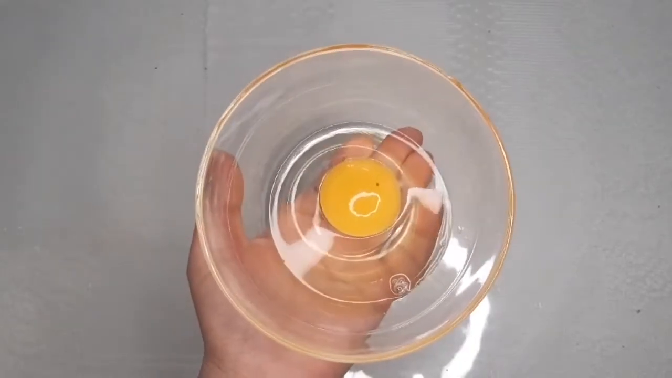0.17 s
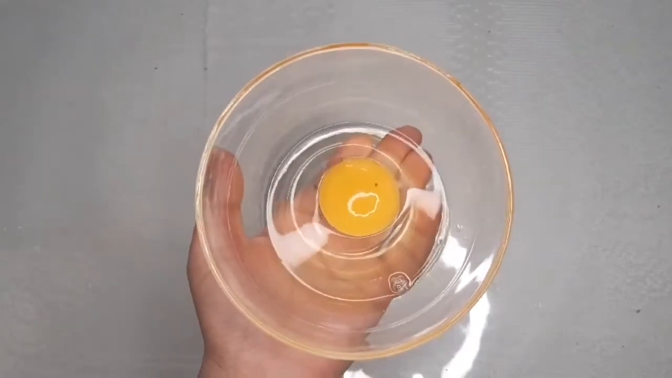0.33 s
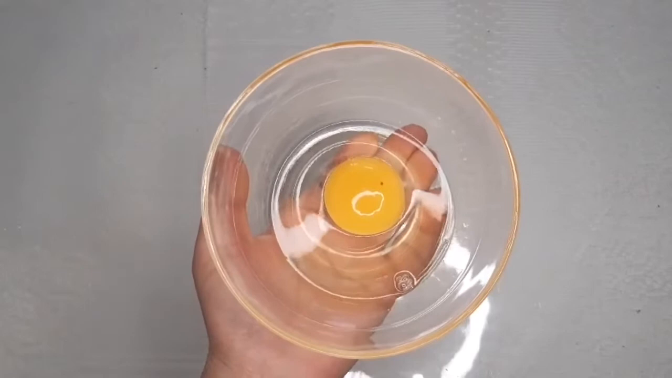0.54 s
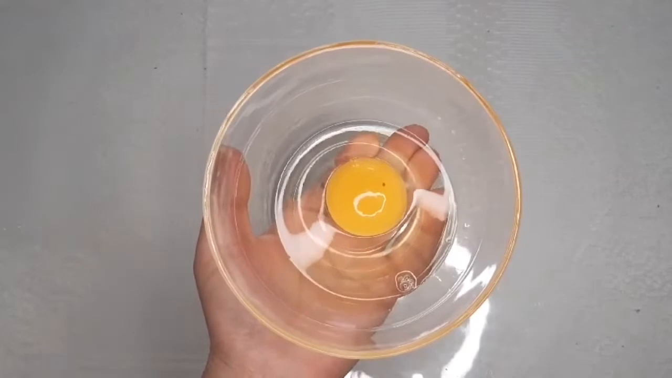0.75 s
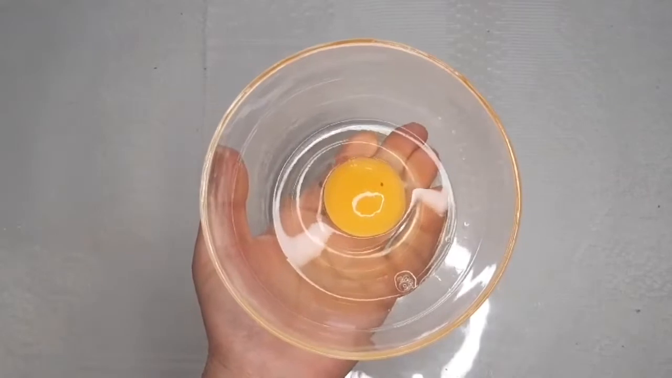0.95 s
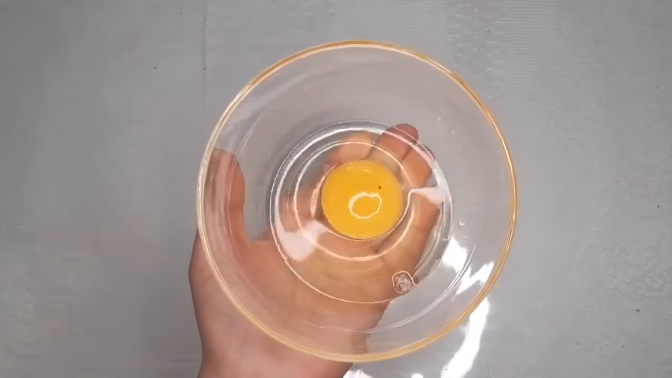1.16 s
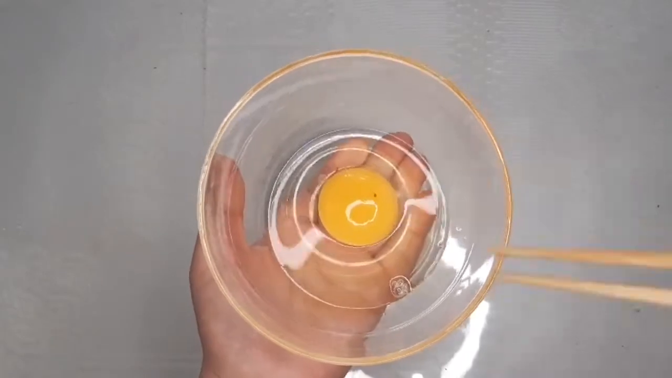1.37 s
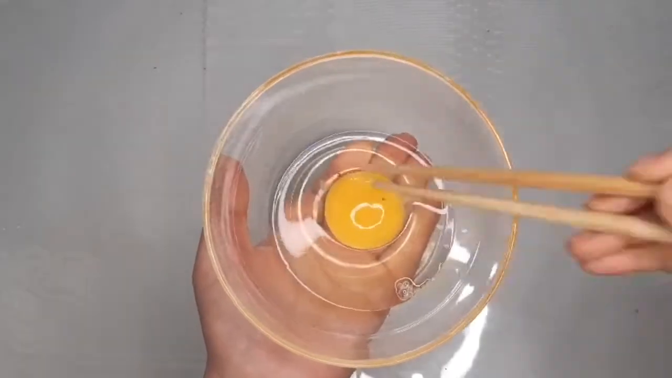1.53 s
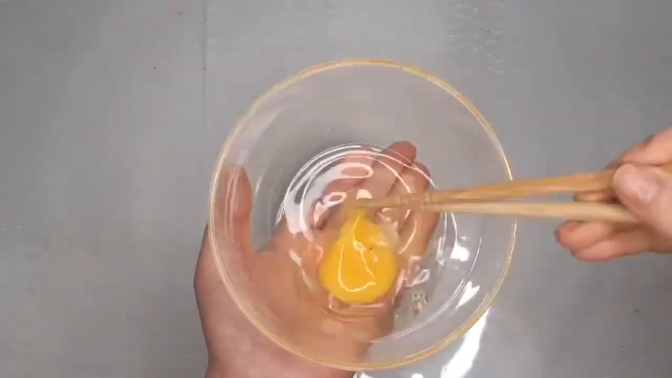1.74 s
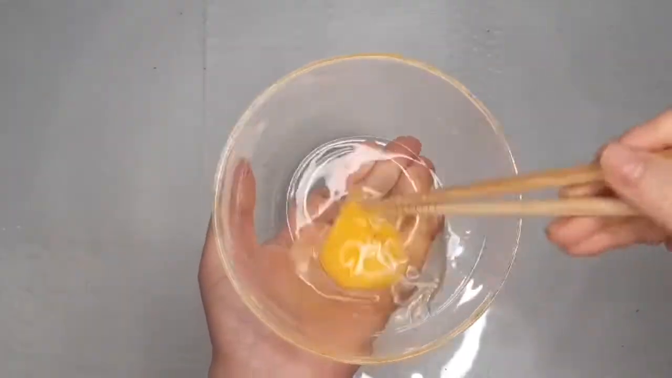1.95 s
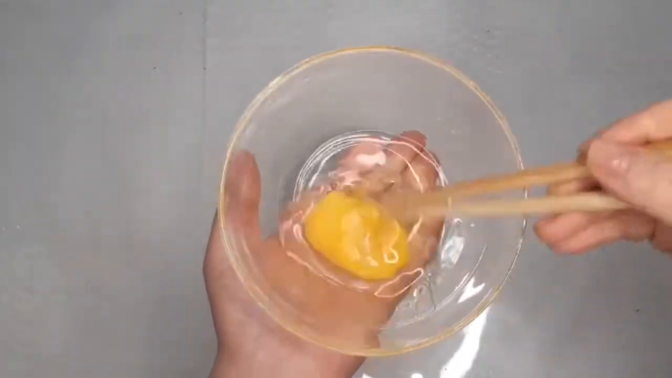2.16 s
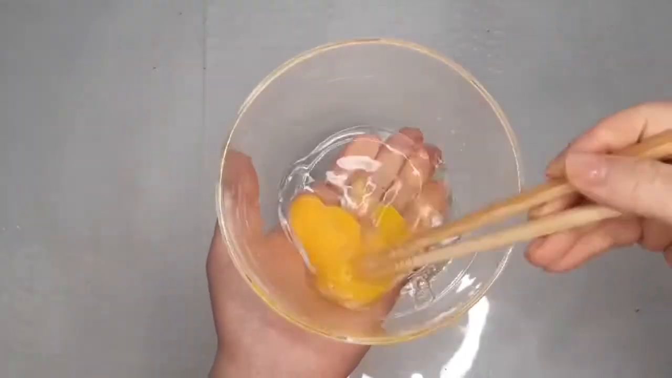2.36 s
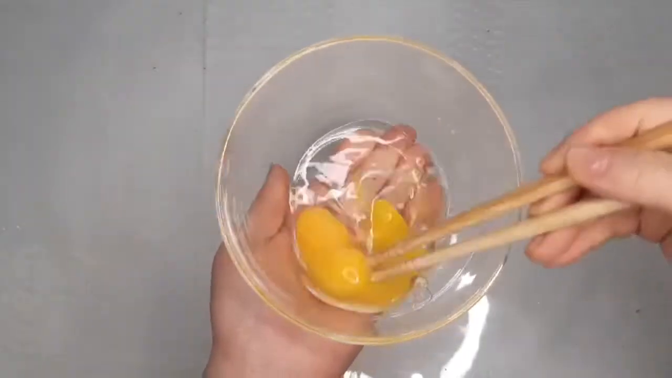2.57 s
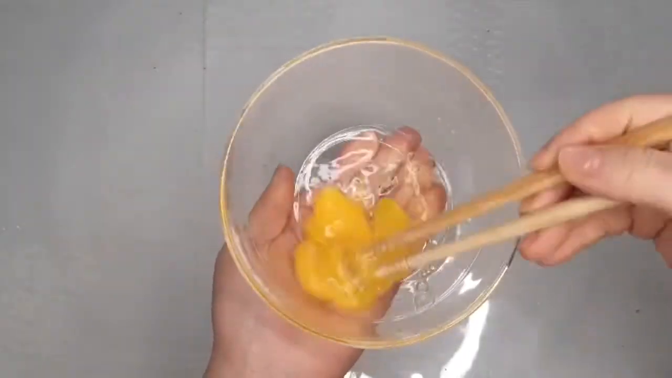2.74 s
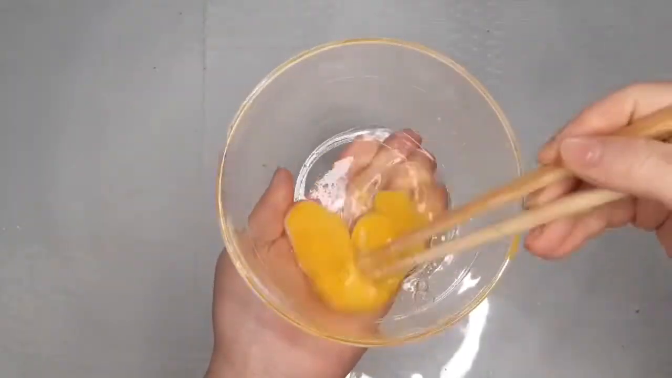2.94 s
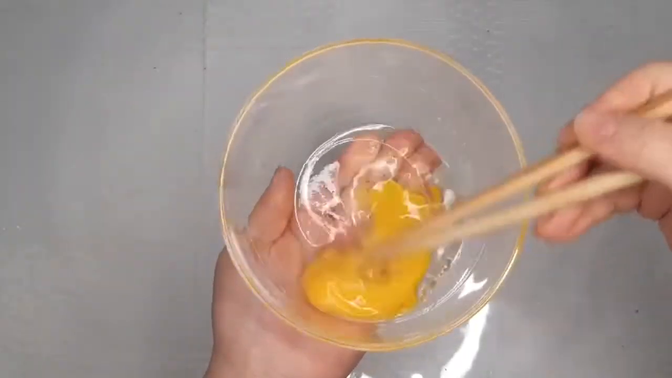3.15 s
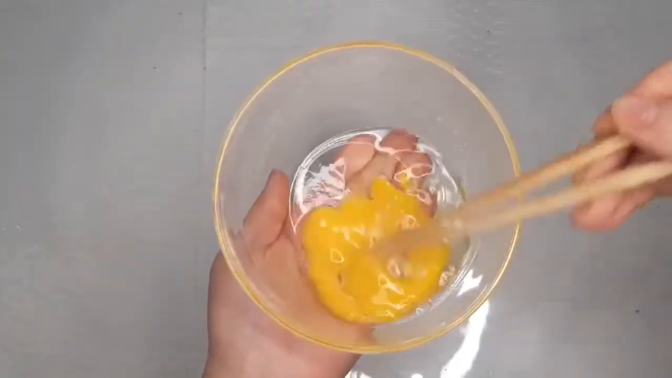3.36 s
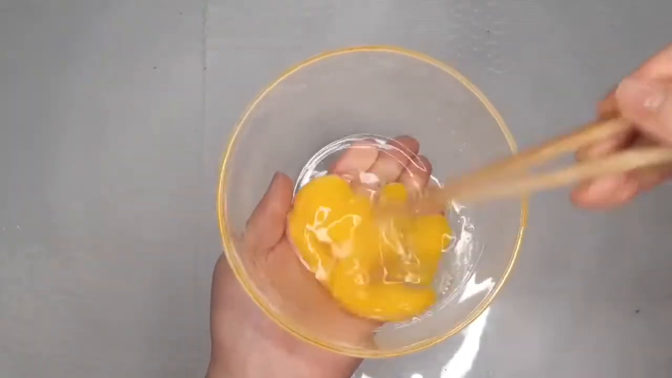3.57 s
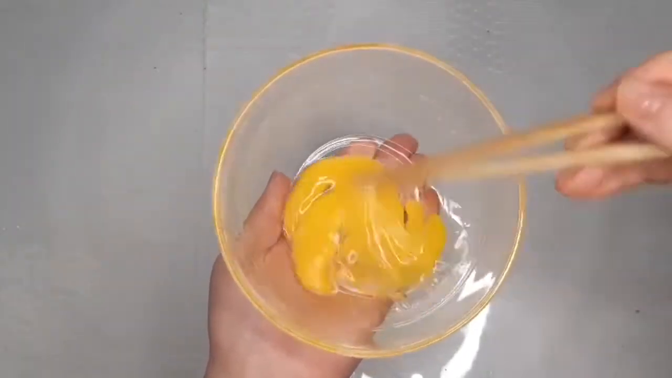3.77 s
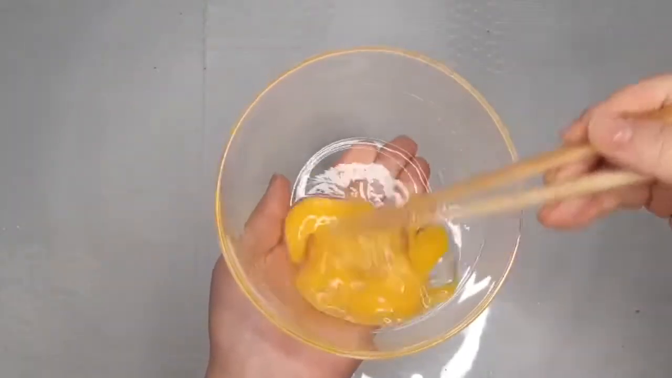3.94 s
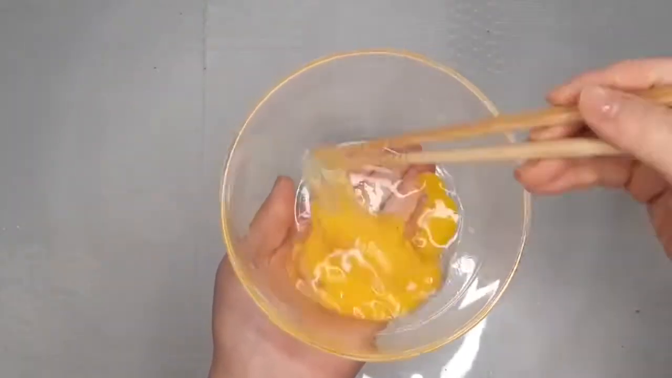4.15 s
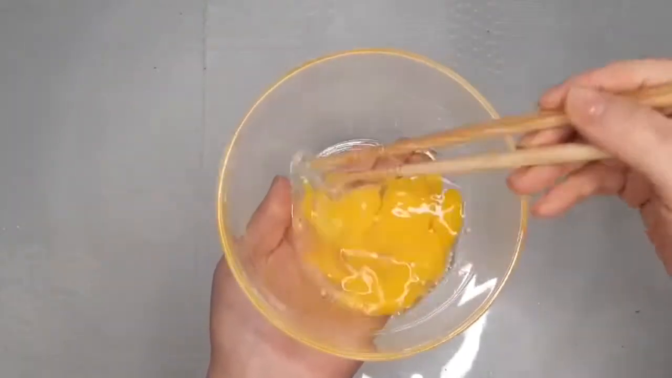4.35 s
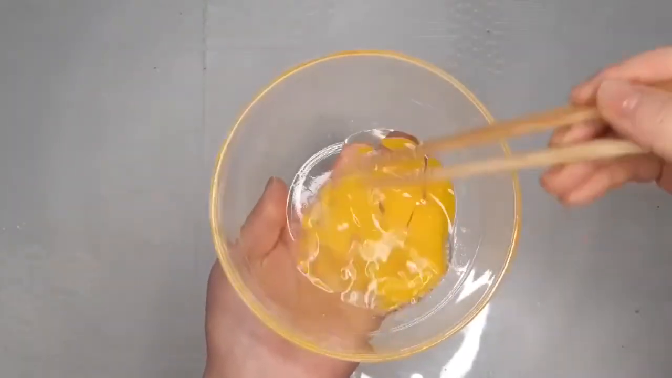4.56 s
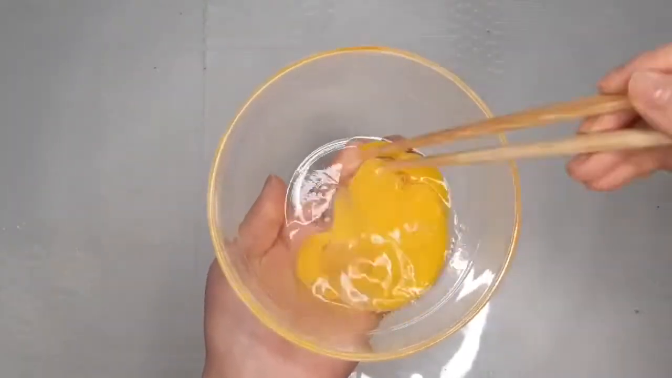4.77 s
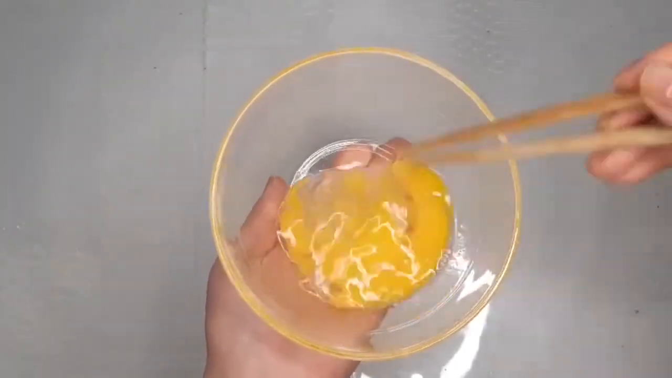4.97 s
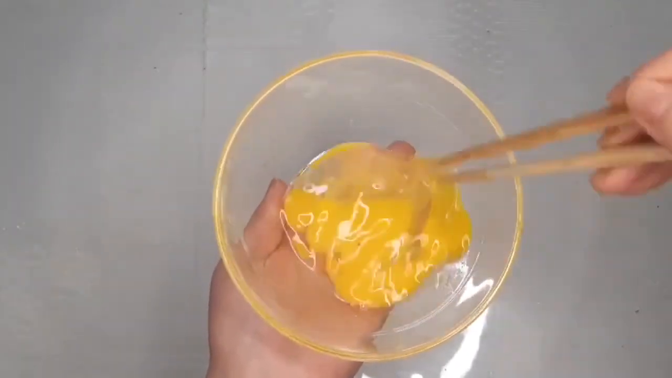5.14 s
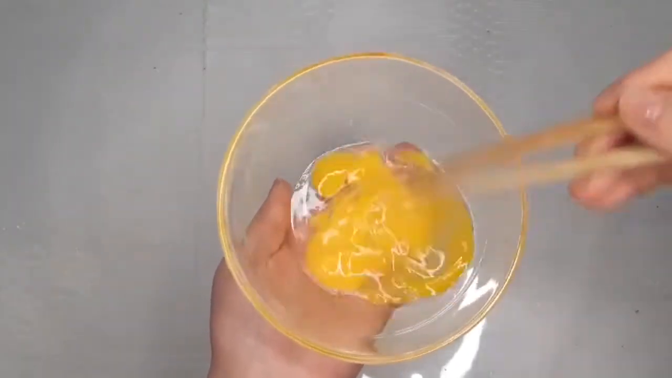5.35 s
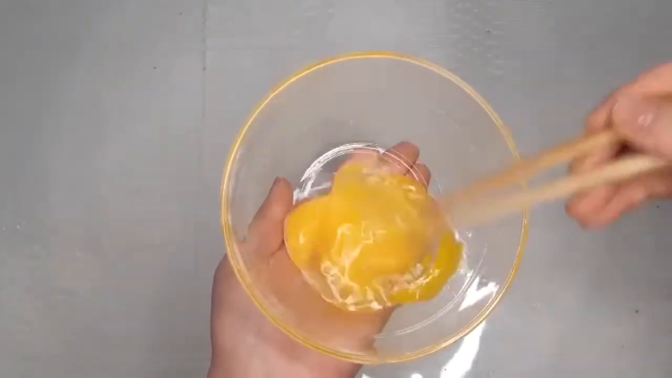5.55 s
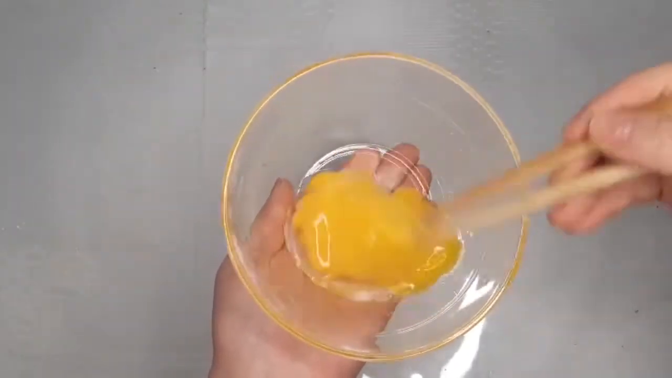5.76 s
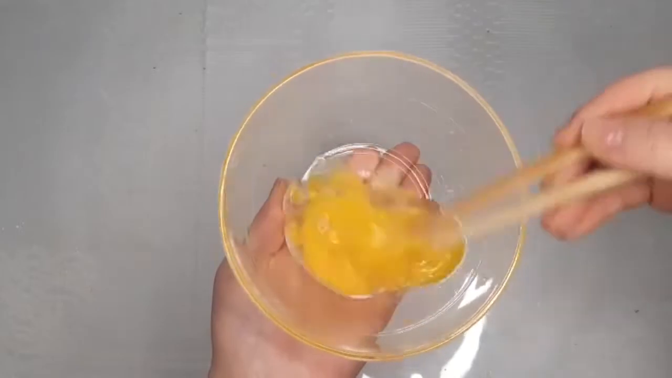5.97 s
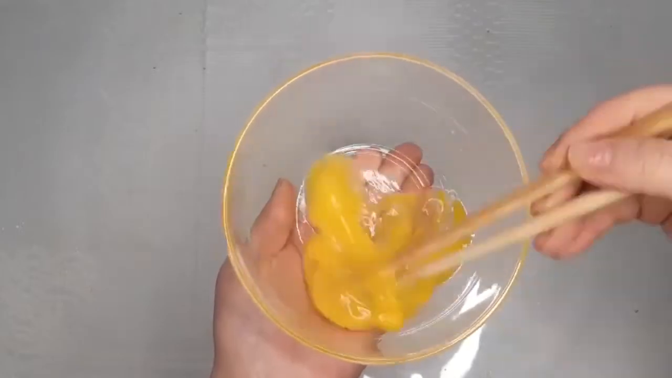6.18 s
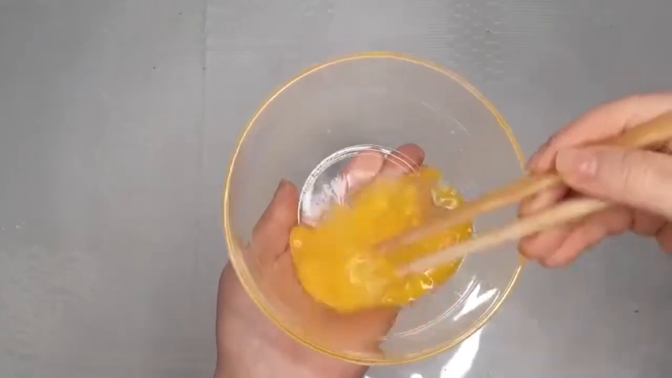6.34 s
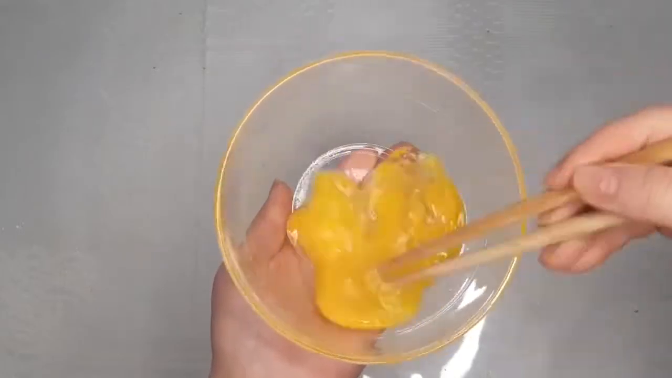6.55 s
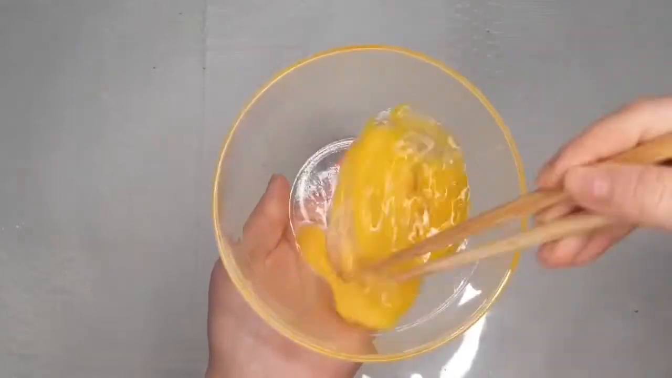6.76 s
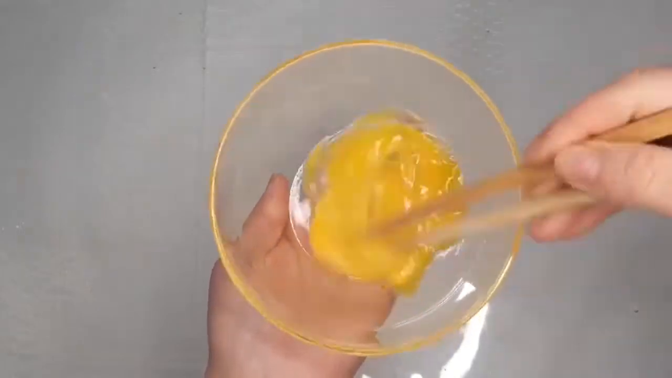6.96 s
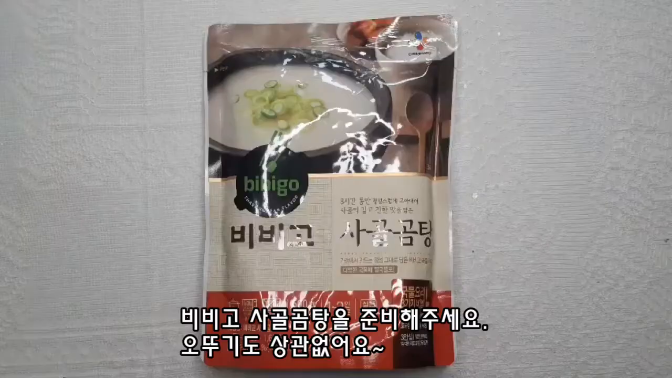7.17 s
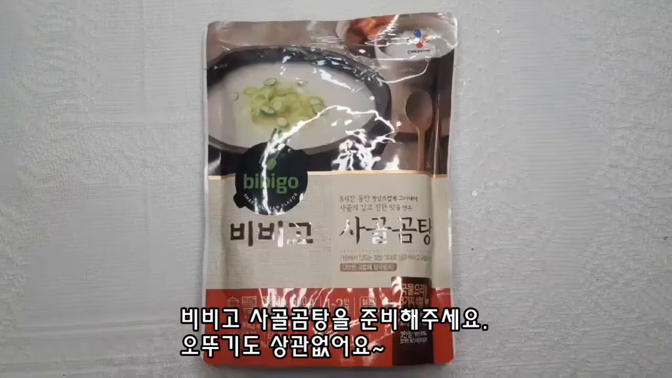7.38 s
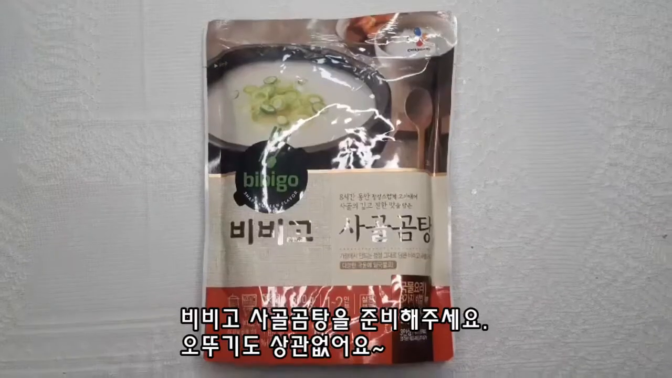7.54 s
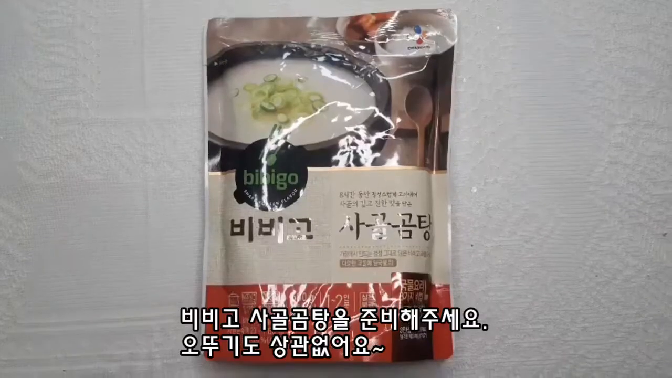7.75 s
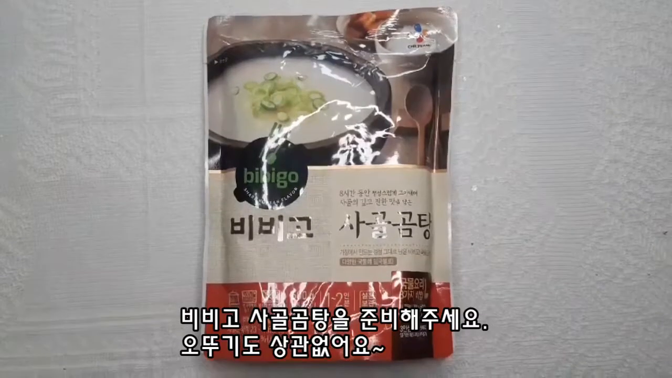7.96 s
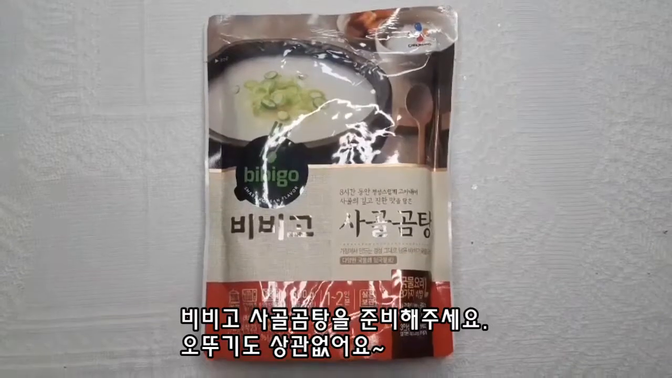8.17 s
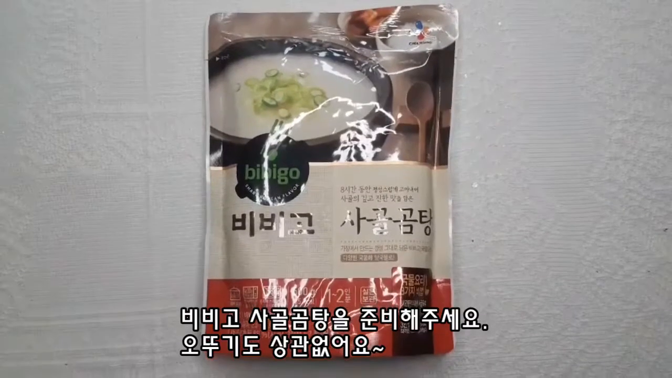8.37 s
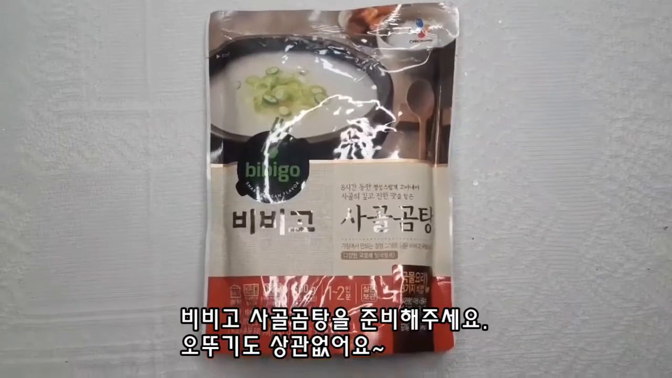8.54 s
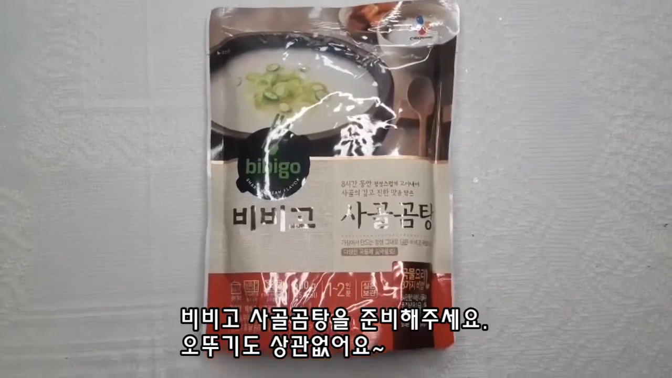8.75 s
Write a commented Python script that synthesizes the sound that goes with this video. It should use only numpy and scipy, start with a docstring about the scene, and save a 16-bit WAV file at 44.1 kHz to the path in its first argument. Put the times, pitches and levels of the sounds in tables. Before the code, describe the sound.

Close up in a small room, faint hum and room noise come first. Then wooden chopsticks beat a raw egg in a glass bowl, about five dull, irregular clicks a second, with wet pops, tiny bright ticks and soft fizzing. A few blows on bare glass ring briefly. The beating cuts to a blink of silence, then quieter room tone with a low drone.

```python
"""Wooden chopsticks beat a raw egg in a hand-held glass bowl, about five strokes a second, in a small room.
Tips knocking on wet glass are short pushes with chattering slips; a few blows on the bare wall ring the bowl's modes.
Thin films snap as bright ticks, air pockets pop as gliding tones, and the egg fizzes and gurgles in clouds of bubbles.
Mains hum and filtered room noise lie under it; after a brief silence a quieter room tone with a low drone follows."""
import sys
import numpy as np
from scipy import signal
from scipy.fft import rfft, irfft
from scipy.io import wavfile
from scipy.ndimage import uniform_filter1d

SR = 44100
rng = np.random.default_rng(int(sys.argv[2]) if len(sys.argv) > 2 else 0)


def to_wav(sig):
    """Store sig (one row per channel, or 1-D mono) as 16-bit WAV at the path in sys.argv[1].

    Samples outside -1..1 are clipped; the rate is SR.
    """
    pcm = np.clip(np.atleast_2d(sig), -1, 1) * 32767
    pcm = np.round(pcm).astype(np.int16)
    wavfile.write(sys.argv[1], SR, pcm.T)  # frames by channels


N = 388521
TIME = np.arange(N) / SR

# Skid into the glass and chatter to rest; a table treble of PLAIN_TREBLE_DB leaves the wood colour unchanged
SKID_S, CHATTER_S, PLAIN_TREBLE_DB = 0.005, 0.0051, -18
# Damped resonance: width in a knock, height in a knock or a snap
STICK_WIDTH_HZ, STICK_DB = 340, 8
# Wet surfaces crackle as they part: share of the first slips (doubled in pops), decay time
LINGER, LINGER_S = 0.074, 0.026
# Colour of wood on wet glass: pitch_hz, level_db (relative)
WOOD_COLOUR = [(500, -14), (1100, -4), (1600, -14), (2200, 2.5), (3200, -2), (7000, -3), (9000, -14.5),
               (16000, -27.5)]
# Tips knocking on egg-damped glass: push_s (before late_s), level_db (before gain_db),
# resonance_hz (strongest), treble_db (against the whole knock)
KNOCKS = [(1.7822, -43.5, 2220, -29), (1.9228, -38, 2000, -9), (2.3408, -21, 1900, -14),
          (2.5171, -14, 3320, -7.5), (2.7022, -19.5, 3430, -18), (2.85, -21.5, 2020, -12.5),
          (2.9028, -17, 4630, -17.5), (3.0945, -19, 3160, -24.5), (3.225, -22.5, 3660, -14),
          (3.4062, -29, 3670, -26), (3.457, -32, 2570, -20.5), (3.6012, -31, 2000, -18),
          (3.7915, -20, 6900, -15), (4.041, -26, 1890, -22.5), (4.0804, -31.5, 4860, -6),
          (4.2209, -23.5, 2110, -22.5), (4.353, -22, 2120, -17.5), (4.531, -35, 4670, -12),
          (4.787, -28, 2540, -32), (4.9324, -21.5, 6600, -22), (5.08, -34.5, 2230, -23.5),
          (5.292, -19, 2320, -13.5), (5.57, -26.5, 2100, -12.5), (5.8519, -23.5, 2750, -17),
          (6.047, -30, 3540, -6.5), (6.238, -28.5, 2170, -22), (6.3057, -18, 4660, -27),
          (6.68, -27, 2880, -9.5)]


def knocks(gain_db=-2, late_s=0.0013):
    """Dull wooden clicks: the tip skids into the glass, and the egg stops it from ringing."""
    out = np.zeros((2, N))
    for push_s, level_db, resonance_hz, treble_db in KNOCKS:
        knock = contact(WOOD_COLOUR, CHATTER_S, chatter=1.7, peak_hz=resonance_hz, peak_db=STICK_DB,
                        treble_db=treble_db - PLAIN_TREBLE_DB, lead=SKID_S, linger=LINGER)
        add(out, push_s + late_s - SKID_S, amp(level_db + gain_db) * placed(knock, early_db=-12))
    return out


# The bowl is not quite round: each mode has a slightly higher twin that beats with it
TWIN_HZ, TWIN_DB = 17, -15
# Colour of wood on bare glass: pitch_hz, level_db (relative)
BARE_COLOUR = [(250, -12.5), (480, 4), (850, -6.5), (2600, 12), (4600, -3.5), (6700, 5.5), (9000, -15),
               (16000, -25)]
# Ringing modes of the bowl: pitch_hz, level_db (relative), t60_s
BOWL_MODES = [(1071, -16, 0.66), (2243, 0.5, 0.35), (3828, -18, 0.3), (5735, -17.5, 0.26),
              (7994, -25, 0.19), (10520, -28, 0.18)]
# Blows and light touches on the bare wall: push_s, knock_db (before gain_db), ring_db,
# fullness_db (per octave away from the main mode), third_db (extra on the third mode)
STRIKES = [(1.55, -30, -32, -8.5, -8), (4.7253, -14.5, -36, 5.5, 6), (4.905, -22.5, -42, 2, 12.5),
           (5.4476, -7.5, -27.5, 0.5, -10.5), (5.6539, -14, -24, -0.5, -2.5)]


def strikes(gain_db=-4, firm_db=-15, skid_s=0.0034, size=30000):
    """A knock on bare glass, brighter when harder, sets the modes ringing in a balance set by touch and spot."""
    out, t = np.zeros((2, N)), np.arange(size) / SR
    for push_s, knock_db, ring_db, fullness_db, third_db in STRIKES:
        knock = contact(BARE_COLOUR, skid_s, chatter=1.1, treble_db=(knock_db - firm_db) / 2,
                        lead=skid_s, linger=LINGER)
        add(out, push_s - skid_s, amp(knock_db + gain_db) * placed(knock))
        ring = np.zeros(size)
        for index, (hz, level_db, t60_s) in enumerate(BOWL_MODES):
            twin = amp(TWIN_DB) * np.sin(2 * np.pi * (hz + TWIN_HZ) * t)
            touch_db = fullness_db * abs(np.log2(hz / 2240))
            spot_db = third_db if index == 2 else 0
            decay_db = -60 * t / t60_s
            ring += amp(level_db + touch_db + spot_db + decay_db) * (np.sin(2 * np.pi * hz * t) + twin)
        # the whole wall radiates the ring, so nearby reflections hardly colour it
        add(out, push_s, amp(ring_db) * placed(ring, early_db=-30))
    return out


# Slips come in clumps about a millisecond long, which makes them clatter
CLATTER_DB = 3.5


def contact(colour, length, chatter, peak_hz=0, peak_db=0, treble_db=0, width_hz=STICK_WIDTH_HZ,
            lead=0.00049, linger=0, size=4096):
    """Clumped slips build to a sharp push and die away through a damped body; energy of 1 ms at level one."""
    t, hz = np.arange(size) / SR, np.fft.rfftfreq(size, 1 / SR)
    after = np.maximum(t - lead, 0)
    fade = np.exp(-after / max(length, 1e-4)) + linger * np.exp(-after / LINGER_S)
    build = np.minimum(t / lead, 1) ** 2
    clumps = amp(CLATTER_DB * unit(uniform_filter1d(rng.standard_normal(size), size=44)))
    slips = rng.standard_normal(size) * clumps * build * fade
    push = np.arange(size) == round(lead * SR)
    force = push + chatter * slips / np.linalg.norm(slips)

    tilt_db = treble_db * np.clip(np.log2(hz / 3500 + 1e-9), 0, 1)
    resonance_db = peak_db / (1 + ((hz - peak_hz) / width_hz) ** 2)
    body_db = read(colour, hz) + tilt_db + resonance_db
    # minimum phase: the body answers only after the force
    log_gain = np.log(amp(np.r_[body_db, body_db[-2:0:-1]]))
    body = np.exp(np.conj(signal.hilbert(log_gain)))[:len(hz)]
    return unit(irfft(rfft(force) * body)) * np.sqrt(SR / 1000 / size)


# Splutter that opens a pocket: decay and rise times
SPLUTTER_S, SPLUTTER_RISE_S = 0.0028, 0.002
# Colour of a wet snap or splutter: pitch_hz, level_db (relative)
WET_COLOUR = [(200, -13), (1000, -20.5), (2200, 5.5), (7200, -1.5), (9000, -10), (13000, -8.5),
              (16000, -20)]
# Air pockets popping: start_s (of the ring), level_db (before gain_db), pitch_hz, ring_cycles,
# glide_octaves (over the ring length), splutter_db (against the ring, before wet_db)
POPS = [(1.8172, -31, 1360, 19, 0.066, -36), (1.97, -24.5, 3190, 13, 0.025, -18),
        (2.1538, -28.5, 3270, 24, -0.04, -9.5), (2.5204, -24.5, 3080, 16, -0.19, -16),
        (3.206, -18, 1590, 6.5, -0.21, -14), (3.2797, -19, 2760, 15.5, 0.063, -16.5),
        (3.3099, -25.5, 2970, 5.9, -.2, -11.5), (3.6529, -16.5, 2927, 21, -0.064, -16.5),
        (3.854, -14, 2870, 5, 0.21, -23), (4.1646, -25, 1288, 12.3, -0.22, -20),
        (4.6309, -24, 2640, 17, -0.16, -11.5), (5.381, -22.5, 1430, 10.6, -0.28, -7.5),
        (5.88, -33.5, 3397, 14.7, 0.22, -31), (6.1153, -17, 3020, 13, 0.032, -19),
        (6.265, -21, 1270, 5.3, -0.18, -25.5), (6.3269, -20, 1147, 19.3, 0.25, -33),
        (6.4164, -23.5, 4220, 9.3, -0.041, -18.5), (6.475, -33, 2170, 15, 0.38, -29),
        (6.498, -23.5, 2860, 9.5, -0.16, -16.5), (6.5139, -22.5, 849, 19.6, -0.14, -15),
        (6.613, -29.5, 996, 16.5, 0.087, -20), (6.662, -31, 1123, 16, 0.14, -19),
        (6.726, -37, 1870, 7.7, .1, -10.5), (6.847, -46.5, 1210, 13, .15, -23),
        (6.936, -43, 1210, 12, -0.032, -32)]


def pops(gain_db=2, wet_db=10):
    """A wet splutter opens each pocket, which rings a few cycles; a wetter burst leaves less for the ring."""
    out = np.zeros((2, N))
    for start_s, level_db, pitch_hz, cycles, glide, splutter_db in POPS:
        wet = amp(splutter_db + wet_db)
        pop = wet * contact(WET_COLOUR, SPLUTTER_S, chatter=6.8, lead=SPLUTTER_RISE_S, linger=2 * LINGER)
        add(pop, SPLUTTER_RISE_S, bubble(pitch_hz, cycles, glide, wobble=0.021))
        balanced = pop / np.hypot(1, wet)
        add(out, start_s - SPLUTTER_RISE_S, amp(level_db + gain_db) * placed(balanced))
    return out


def bubble(hz, cycles, glide=0, wobble=0, burst=0.777, burst_cycles=3.3, size=4096):
    """A pocket bursts open, then rings gently; pitch wobbles, gliding up as it surfaces or down as it opens."""
    t, decay = np.arange(size) / SR, cycles / hz
    opening = min(decay / 2, .0006)
    rise = 1 - np.exp(-(t / opening) ** 2)
    fall = np.exp(-(t / decay) ** 1.7)
    shape = rise * fall * (1 + burst * np.exp(-t * hz / burst_cycles))
    waver = 1 + wobble * unit(uniform_filter1d(rng.standard_normal(size), size=90))
    pitch = hz * 2 ** (glide * (t / decay - .5)) * waver
    return shape / shape.max() * np.sin(2 * np.pi * np.cumsum(pitch) / SR)


SNAP_S, SNAP_TREBLE_DB_PER_OCTAVE = 0.0011, 16
# Short wet ticks: thin films snapping as the sticks cut through and lift, and (the lower ones, below about 5
# kHz) light taps of the tips: start_s, level_db (before gain_db), pitch_hz
TICKS = [(2.012, -27, 8600), (2.4718, -27.5, 6400), (2.7455, -27, 9700), (2.8336, -27, 8040),
         (3.0443, -20, 7700), (3.203, -29, 13100), (3.9662, -11.5, 8800), (4.344, -19, 12700),
         (4.4152, -32, 3180), (4.4435, -34.5, 4710), (4.5527, -32.5, 2200), (4.6092, -28, 3170),
         (5.3582, -24.5, 3050), (6.599, -32.5, 3140), (6.616, -23.5, 12200), (6.936, -26.5, 11000)]


def ticks(gain_db=-5.5):
    """One very short tick, from a breaking film or a light tap of a tip: the higher, the brighter."""
    out = np.zeros((2, N))
    for start_s, level_db, pitch_hz in TICKS:
        treble_db = SNAP_TREBLE_DB_PER_OCTAVE * np.log2(pitch_hz / 4000)
        tick = contact(WET_COLOUR, SNAP_S, chatter=1.3, peak_hz=pitch_hz, peak_db=STICK_DB,
                       width_hz=pitch_hz / 6, treble_db=treble_db)
        add(out, start_s, amp(level_db + gain_db) * placed(tick))
    return out


# Every knock, strike, pop and snap: its time and level lead each row
EVENTS = [*KNOCKS, *POPS, *TICKS, *STRIKES]


def settling(kicks, settle_s):
    """Each kick dies away exponentially, and overlapping kicks add up."""
    return signal.lfilter([1], [1, -np.exp(-1 / (settle_s * SR))], kicks)


def stirring(start_s=1.5, rest=0.64, splash=0.65, settle_s=0.028):
    """Relative egg speed: a steady swirl once the sticks are in, with a capped surge after every event."""
    hits = np.zeros(N)
    hits[[round(row[0] * SR) for row in EVENTS]] = 1
    surge = np.minimum(settling(hits, settle_s), 1)
    return (TIME > start_s) * (rest + splash * surge)


def spray(settle_s=0.038):
    """How much egg is flying: each knock, strike, pop or snap throws up a share by its strength, which settles."""
    throws = np.zeros(N)
    for start_s, level_db, *_ in EVENTS:
        throws[round(start_s * SR)] += amp(level_db)
    return settling(throws, settle_s)


# Wet fizz of the spray: grains a second and size spread; the swirl has twice the grains, half the spread
FIZZ_PER_S, FIZZ_SPREAD_DB = 1500, 3.5


def squelch(speed, swirl_gain_db=-67, spray_gain_db=-38):
    """The swirling egg gives a faint, fine wet rustle; the spray after each event is louder and coarser."""
    swirl = amp(swirl_gain_db) * speed * fizz(2 * FIZZ_PER_S, FIZZ_SPREAD_DB / 2)
    return swirl + amp(spray_gain_db) * spray() * fizz(FIZZ_PER_S, FIZZ_SPREAD_DB)


def fizz(per_s, spread_db, count=30):
    """Tiny films tear and tiny bubbles ring for a few cycles, at random moments and in random sizes."""
    out = np.zeros(N)
    for hz, cycles in zip(np.geomspace(1400, 11000, count), np.resize([1.5, 3, 6], count)):
        sizes = amp(spread_db * np.minimum(rng.exponential(1, N), 4))
        moments = rng.random(N) < per_s / count / SR
        out += signal.oaconvolve(sizes * moments, bubble(hz, cycles))[:N]
    return out


def gurgles(speed, gain_db=-48, per_s=32, cycles=17, count=12):
    """Soft, muffled bubbles turn over deep in the swirling egg."""
    out = np.zeros(N)
    for hz in np.geomspace(1050, 2900, count):
        moments = rng.random(N) < per_s / count / SR
        out += signal.oaconvolve(rng.random(N) * moments, bubble(hz, cycles, wobble=.1))[:N]
    return amp(gain_db) * out * speed


# Colour of the sloshing egg: pitch_hz, level_db (relative, per Hz)
SLOSH_COLOUR = [(60, -15.5), (300, 5.5), (550, -4.5), (1200, -6.5), (2500, -39)]


def slosh(speed, level_db=-54):
    """The moving body of egg makes a low noise that follows its speed."""
    return amp(level_db) * speed * noise(SLOSH_COLOUR)


# The bowl is nearer the left microphone: pitch_hz, lead_db (left minus right)
LEFT_LEAD = [(400, 0), (9000, 4.5)]


def placed(sound, early_db=-11, size=1024):
    """Each spot has its own lag at the right microphone and quick reflections off glass and table."""
    t, hz = np.arange(size) / SR, np.fft.rfftfreq(size, 1 / SR)
    # the lag's phase stops growing with frequency at a random limit
    turn = np.minimum(2 * np.pi * hz * rng.uniform(5e-5, 1.2e-4), rng.uniform(.8, 1.9))
    early = rng.standard_normal((2, size)) * (t > .0003) * np.exp(-t / 0.0059)
    reflections = rfft(amp(early_db) * unit(early)) / np.sqrt(size)
    paths = np.exp(1j * np.outer([.5, -.5], turn)) + reflections
    sides = amp(np.outer([.5, -.5], read(LEFT_LEAD, hz)))
    # centred so that the left side may lead
    response = np.roll(irfft(paths * sides), size // 2, axis=1)
    return signal.oaconvolve(sound[None], response, axes=1)[:, size // 2:][:, :len(sound)]


# Decay of the small room: pitch_hz, t60_s (before the extra treble loss of dull_db)
ROOM_DECAY = [(1000, 0.53), (3000, 0.23), (14000, 0.42)]


def room(x, tail_db, dull_db=-4, size=20000):
    """The walls of a small room answer with a short tail, duller than the direct sound."""
    taps = rng.standard_normal((2, size)) * (np.arange(size) / SR > .004)
    hz, t, z = signal.stft(taps, SR, nperseg=256)
    decay_db = -60 * t / read(ROOM_DECAY, hz)[:, None]
    treble_db = dull_db * np.log2(np.maximum(hz / 6000, 1))[:, None]
    faded = signal.istft(z * amp(decay_db + treble_db), SR, nperseg=256)[1][:, :size]
    tail = unit(faded) / np.sqrt(size)
    return x + amp(tail_db) * signal.oaconvolve(x, tail, axes=1)[:, :N]


# Mains lines: pitch_hz, level_db (rms, before the wavering)
HUM_LINES = [(119.6, -62.5), (179.6, -63)]


def hum():
    """Mains lines that waver in level and phase."""
    out = np.zeros(N)
    for hz, level_db in HUM_LINES:
        waver = 1 + 0.38 * drift(8.6)
        out += amp(level_db) * np.sqrt(2) * waver * np.sin(2 * np.pi * hz * TIME + 1.3 * drift(1.0))
    return out


# Colour of the room noise during the beating: pitch_hz, level_db (relative, per Hz)
AIR_COLOUR = [(25, -24), (60, -3), (215, -5.5), (400, -12), (600, -19), (1050, -18), (2700, -35.5),
              (13600, -38), (16000, -44)]


def air(level_db=-52.5):
    """Steady room noise under the beating."""
    return amp(level_db) * noise(AIR_COLOUR)


# Colour of the later room noise: pitch_hz, level_db (relative, per Hz)
LATE_AIR_COLOUR = [(25, -40), (55, 0.5), (350, -8), (600, -18.5), (1000, -13.5), (2500, -33.5), (5600, -43),
                   (6900, -33), (8500, -48), (12500, -41)]
# Swell of the low drone: time_s, level_db (peak)
DRONE_SWELL = [(7.4, -51), (7.95, -67), (8.3, -50), (8.8, -55.5)]


def late_tone(air_db=-55, drone_hz=54):
    """The quieter room, with the hum and a low swelling drone."""
    swell = amp(np.interp(TIME, *np.transpose(DRONE_SWELL)))
    drone = swell * np.sin(2 * np.pi * drone_hz * TIME + 1.2 * drift(6.0))
    return amp(air_db) * noise(LATE_AIR_COLOUR) + hum() + drone


# Likeness of the two noise channels: pitch_hz, share (0 to 1)
AIR_LIKENESS = [(300, 0.89), (1800, 0.092)]


def noise(spectrum):
    """Stereo noise of a given colour and rms one, nearly mono in the bass."""
    hz = np.fft.rfftfreq(N, 1 / SR)
    left, other = rfft(rng.standard_normal((2, N)))
    same = np.clip(read(AIR_LIKENESS, hz), 0, 1)
    right = same * left + np.sqrt(1 - same ** 2) * other
    return unit(irfft(np.array([left, right]) * amp(read(spectrum, hz)), N))


def drift(hz):
    """A random wander of rms one, mostly slower than hz."""
    smooth = np.exp(-(np.fft.rfftfreq(N, 1 / SR) / hz) ** 2)
    return unit(irfft(rfft(rng.standard_normal(N)) * smooth, N))


def amp(db):
    """Decibels to gain."""
    return 10 ** (np.asarray(db) / 20)


def unit(x):
    """Scales to an rms of one."""
    return x / np.sqrt(np.mean(x ** 2) + 1e-20)


def read(points, hz):
    """Reads a curve on a log-frequency axis."""
    f, value = np.transpose(points)
    return np.interp(np.log(hz + 1), np.log(f + 1), value)


def add(mix, start_s, sound):
    """Mixes a sound in at start_s, cut off at the end of the mix."""
    part = mix[..., round(start_s * SR):][..., :sound.shape[-1]]
    part += sound[..., :part.shape[-1]]


# Brief silence: start_s, end_s
PAUSE = (7.127, 7.181)


def scene(clump_db=-3.0):
    """The beating over room noise, a brief silence, then room tone alone."""
    speed = stirring()
    clumpy_speed = speed * amp(clump_db * drift(31))
    egg = pops() + ticks() + placed(squelch(clumpy_speed) + gurgles(speed))
    beating = room(knocks() + strikes(), tail_db=-13.5) + room(egg, tail_db=-16.0) + slosh(speed)
    beating = beating + air() + hum()
    # 2 ms fades on both sides of the silence
    before = np.clip((PAUSE[0] - TIME) / .002, 0, 1)
    after = np.clip((TIME - PAUSE[1]) / .002, 0, 1)
    return before * beating + after * late_tone()


def record(dry, edge_hz=16200):
    """A steep low-pass takes off the extreme treble."""
    low_pass = signal.firwin(255, edge_hz, window=("kaiser", 9), fs=SR)
    return signal.oaconvolve(dry, low_pass[None], "same", axes=1)


dry = scene()
out = record(dry)
to_wav(out)
```